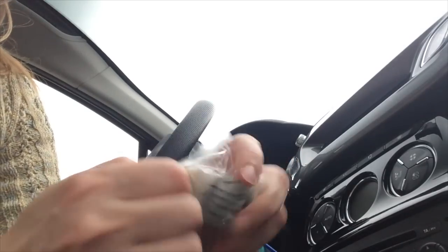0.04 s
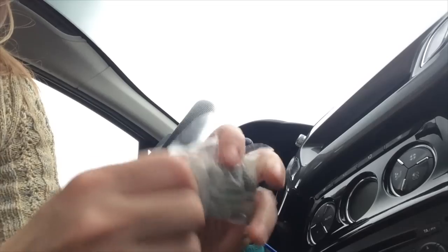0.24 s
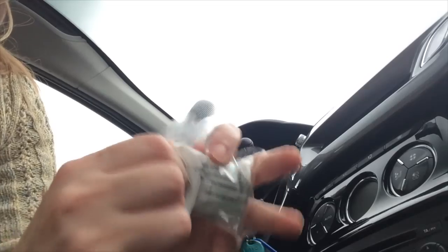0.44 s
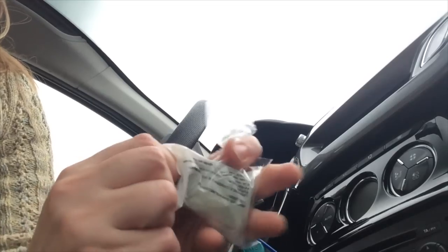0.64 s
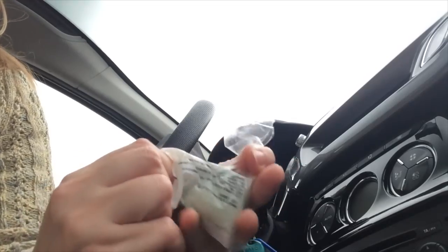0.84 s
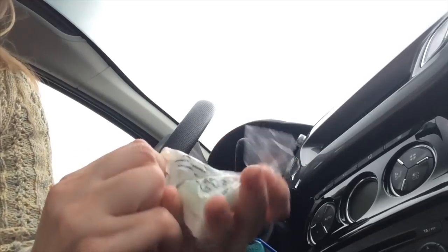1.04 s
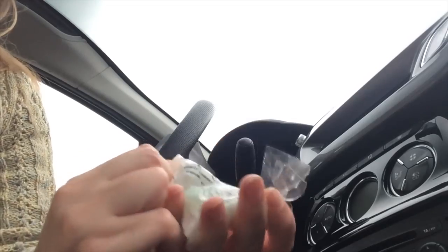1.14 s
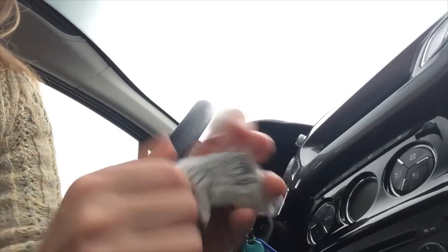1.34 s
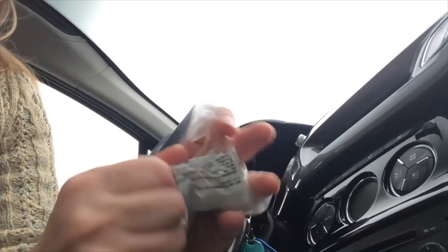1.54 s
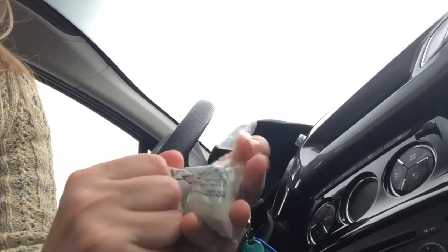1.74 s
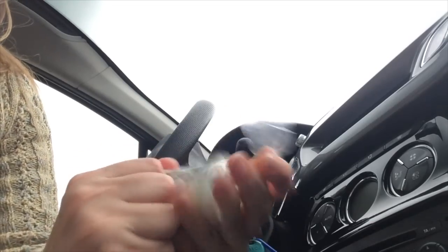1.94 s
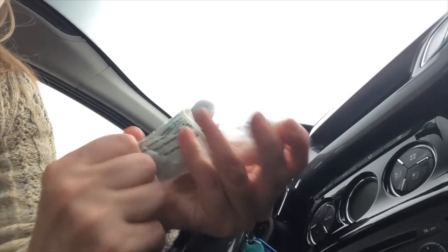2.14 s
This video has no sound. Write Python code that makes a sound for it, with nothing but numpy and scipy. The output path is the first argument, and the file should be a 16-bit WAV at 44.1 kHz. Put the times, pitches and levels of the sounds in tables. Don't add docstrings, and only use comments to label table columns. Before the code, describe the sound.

Close, dry plastic film crackling in irregular snaps, ending in a hard loud crush

```python
import sys
import numpy as np
from scipy import signal
from scipy.fft import rfft, irfft
from scipy.io import wavfile
from scipy.ndimage import uniform_filter1d

SR = 44100
rng = np.random.default_rng(int(sys.argv[2]) if len(sys.argv) > 2 else 0)


def convert_level_to_amplitude(level_db):
    exponent = np.asarray(level_db, float) / 20
    return 10 ** exponent


def digitize_waveform(pressure):
    field = np.atleast_2d(pressure).T
    bounded = np.clip(field, -1, 1)
    quanta = np.round(bounded * 32767).astype(np.int16)
    wavfile.write(sys.argv[1], SR, quanta)


N = 96049

# centre in Hz, width in Hz, level in dB.
ENGINE_MODES = [(59.6, 8.9, -61), (100.6, 14.5, -61)]
# frequency in Hz, density in dB per Hz.
AIR_SPECTRUM = [(130, -8.5), (1000, -16), (14000, -24.5)]
# frequency in Hz, t60 in seconds.
CABIN_DECAY = [(600, 0.052), (2500, 0.042), (11000, 0.036)]
# start in seconds, peak in dB, pitch in
# Hz, t60 in seconds.
AIR_POPS = [
    (1.6383, -5, 720, .004),
    (.553, -35, 165, .06),
    (1.1158, -24, 300, .006),
    (.8241, -27, 300, .008),
]
# start in seconds, peak in dB, pitch in Hz, t60 in seconds.
PANEL_RINGS = [
    (.3725, -24, 1000, .012),
    (.6528, -8, 1600, .02),
    (.0856, -11, 3300, .007),
    (1.0608, -11, 1150, .006),
]
# frequency in Hz, level in dB.
FILM_COLOUR = [(700, -4), (1500, -0.5), (4500, 4.5), (9000, -8), (14000, -3.5)]
# start in seconds, length in seconds, level in dB.
RUBS = [
    (-.02, 0.035, -53),
    (0.09, 0.1, -37),
    (0.342, 0.04, -38),
    (0.497, 0.056, -38),
    (0.564, 0.108, -33),
    (1.402, 0.052, -38),
    (1.642, 0.055, -55),
    (2.033, 0.063, -23),
    (2.154, 0.016, -42),
]
# start in seconds, peak in dB, ring in Hz, brightness in dB.
CREASES = [(0.0464, -20, 13100, 19), (0.0495, -35, 13220, 11), (0.0665, -18, 3600, 8.5),
           (0.0858, -8, 10560, 15), (0.0927, -16, 7140, 2), (0.109, -27, 1700, -8),
           (0.1129, -22.5, 6370, -20), (0.1251, -21.5, 1500, 2), (0.1324, -26, 1790, -7),
           (0.1441, -23, 4260, -30), (0.1523, -26, 2330, -5), (0.1595, -21.5, 1640, 3),
           (0.1673, -25, 4690, -13), (0.1715, -21, 3600, -43), (0.1786, -17, 6290, -3),
           (0.1818, -19.5, 2390, -2), (0.2204, -17, 1870, -10), (0.2272, -14, 990, -1),
           (0.2562, -12, 1620, 1), (0.2658, -23, 9000, -4), (0.2752, -21.5, 1760, -24),
           (0.2805, -21, 4270, 2), (0.3073, -34.5, 5140, 3), (0.3095, -20, 4470, -7),
           (0.3162, -20, 1450, -33), (0.3356, -19.5, 5400, -24), (0.3426, -12, 5640, -32.5),
           (0.346, -13, 6700, 26), (0.3535, -17.5, 3030, -12), (0.3727, -24, 1080, 0),
           (0.3972, -12, 7800, 6.5), (0.4401, -33.5, 1500, -15), (0.456, -35, 3280, -26),
           (0.4682, -34, 3720, 8), (0.4717, -22.5, 8910, -8), (0.4821, -6.5, 5540, -9.5),
           (0.5015, -21, 5660, -19), (0.511, -18, 5900, 15), (0.5171, -18, 6200, -16),
           (0.5204, -18.5, 6500, -12), (0.5225, -17.5, 5800, -17), (0.5281, -35, 7540, 5),
           (0.5359, -15, 7580, 22), (0.5425, -18, 13800, 10), (0.5518, -21, 2470, -35),
           (0.5576, -19.5, 5400, -28), (0.5668, -33, 7540, -3), (0.5725, -19, 7300, -11),
           (0.5839, -23, 11930, -21), (0.5882, -18, 13390, 2),
           (0.5977, -18, 7300, -9), (0.6187, -13.5, 2880, -2), (0.624, -33, 7750, -3),
                (0.6524, -10, 5700, -13), (0.6712, -17, 12600, 20), (0.7171, -18, 13700, 2),
                (0.7473, -35, 11540, 11), (0.766, -16.5, 3300, -20), (0.7694, -29, 2660, -13),
                (0.774, -10.5, 13800, 12), (0.7813, -14.5, 4350, -2), (0.7941, -10.5, 10900, 20),
                (0.8104, -13, 5700, -1), (0.8239, -8, 4400, -15), (0.829, -15, 4130, 22),
                (0.8498, -28.5, 4260, 0), (0.8797, -43, 1460, -18), (0.8824, -38, 4520, -14),
                (0.8901, -11, 12500, -9), (0.893, -25, 10160, 17), (0.9193, -14.5, 6700, 2),
                (0.9347, -23, 6760, 4), (0.9695, -16.5, 1580, 10), (0.9745, -19, 9300, -5),
                (0.977, -25, 4010, -3), (0.9963, -20.5, 6540, -8), (1.027, -13.5, 10700, 10),
                (1.0553, -31, 4180, 2), (1.0613, -5, 5350, -17.5), (1.0638, -9.5, 7000, 25),
                (1.11, -21.5, 1480, -6), (1.116, -7.5, 12900, -4), (1.1222, -15, 6450, -12),
                (1.1462, -29, 5640, 3), (1.1531, -29.5, 1760, -26), (1.1575, -36, 2840, -12),
                (1.1593, -33, 4390, -2), (1.1755, -11, 5900, -10), (1.1773, -49, 5860, 2),
                (1.213, -14.5, 2900, 10.5), (1.2164, -33.5, 8600, -21), (1.2726, -53, 1510, -28),
                (1.2944, -16, 1520, 9), (1.2983, -20.5, 10500, -4), (1.3044, -12.5, 3560, 12),
                (1.322, -17.5, 4030, 2), (1.3464, -18.5, 2700, -36), (1.3616, -17.5, 6300, 5),
                (1.3808, -29, 3270, 1), (1.3827, -10.5, 3940, 1),
           (1.3984, -6.5, 3330, -4), (1.408, -19.5, 1200, -15), (1.4152, -17.5, 1890, -34),
                (1.4253, -28, 1810, -28), (1.4311, -13, 3840, 5), (1.4343, -15.5, 1790, -13),
                (1.4528, -16.5, 2860, -7), (1.4786, -20.5, 1540, -45), (1.4945, -13, 2600, -28),
                (1.5183, -15, 3640, -35), (1.525, -18, 4240, -14), (1.5309, -17, 4040, -7),
                (1.5593, -29.5, 8700, -15), (1.5705, -36, 3700, 1), (1.5752, -9.5, 12900, -1),
                (1.613, -48, 5120, -4), (1.6275, -29, 6550, -6), (1.6387, -6, 6600, 5.5),
                (1.6496, -23, 5000, -2), (1.6646, -27.5, 3960, -8), (1.6816, -29, 6100, -3),
                (1.699, -38, 6500, 2), (1.7093, -23, 5570, -4), (1.7202, -15, 2710, -30),
                (1.7642, -26.5, 3040, -27), (1.7668, -35.5, 5500, -15), (1.7876, -19.5, 2130, -11),
                (1.7972, -28.5, 6150, -3), (1.8332, -29, 2120, -34), (1.8456, -37, 7200, -4),
                (1.8782, -61, 7760, 23), (1.883, -34.5, 12800, -10), (1.8945, -13, 3300, 14),
                (1.8984, -22, 3500, 20), (1.941, -30, 7020, 1), (1.9435, -8.5, 1400, 2.5),
                (1.9565, -14, 3420, -38), (1.961, -25, 4160, -11), (1.9764, -40, 1210, -18),
                (1.991, -10.5, 7550, -20), (1.9948, -10.5, 10000, -16), (2.0081, -13, 13800, -4),
                (2.0193, -27, 13870, -21), (2.0237, -3, 4220, -30.5), (2.026, -8, 3270, -6),
                (2.033, -0.5, 4130, 1), (2.0354, -10, 4260, -32), (2.0424, -8, 6640, -16),
                (2.0511, 2, 1590, 4.5), (2.0551, -2, 3960, 14),
           (2.0595, -6.5, 1940, -10), (2.065, -27, 7020, -8), (2.0689, -6, 2870, -18),
                   (2.0744, -16, 3900, -16), (2.0755, -0.5, 7540, 10), (2.0855, -9, 5100, 2),
                   (2.0872, -7, 3530, -10), (2.0932, -29, 3750, -7), (2.108, -11.5, 3780, -3),
                   (2.1303, -22.5, 2850, -10), (2.1339, -21.5, 3280, -36), (2.1579, -22, 3030, -31),
                   (2.1767, -25.5, 3120, -5)]

AIR_DB, FLOOR_FOLLOWS_DB_PER_DB = -56, 0.25
CABIN_DB, CABIN_DELAY_S, CABIN_RISE_S = -11.5, 0.0023, 0.0002
FOLDS_PER_S, FOLD_SPREAD_DB, FOLD_RING_CYCLES, CLUMP_DB = 4000, 4.0, 5.0, 3.0
RUB_RISE_S, REST_DB = 0.006, -75.0
SETTLE_DB, SETTLE_S = -39, 0.013
SPOTS = 5
BUCKLE_S, RING_CYCLES, SNAP_DB = 0.00025, 6.4, 3
FLUTTER_GAIN, FLUTTER_S = 0.22, 0.0004
SHEET_HZ, SHEET_WIDTH_HZ, SHEET_DB = 1706, 980, -12.5
EDGE_HZ, EDGE_DB, BROAD_DB = 7470, 3, 0
STIFF_HZ, PUSH_HZ, PUSH_DB = 444, 350, -39
POP_LOW_CUT_HZ, MIC_TOP_HZ = 230, 15900


def rms_one(x):
    return x / np.sqrt(np.mean(x ** 2) + 1e-20)


def at_hz(points, hz):
    points = np.array(points)
    return np.interp(np.log(hz), np.log(points[:, 0]), points[:, 1])


def drift(rate_hz):
    r = np.exp(-2 * np.pi * rate_hz / SR)
    wander = signal.lfilter([1], [1, -2 * r, r * r], rng.standard_normal(N + 8000))
    return rms_one(wander[8000:])


def resonate(x, hz, width_hz):
    r = np.exp(-np.pi * width_hz / SR)
    poles = [1, -2 * r * np.cos(2 * np.pi * hz / SR), r * r]
    return signal.lfilter([(1 - r * r) / 2, 0, (r * r - 1) / 2], poles, x)


def cut(x, hz, kind, order=2):
    return signal.sosfilt(signal.butter(order, hz, kind, fs=SR, output="sos"), x)


def engine():
    rumble = np.zeros(N)
    for hz, width_hz, db in ENGINE_MODES:
        mode = resonate(rng.standard_normal(N), hz, width_hz)
        rumble += convert_level_to_amplitude(db) * rms_one(resonate(mode, hz, 2 * width_hz))
    return rumble


def air():
    hz = np.maximum(np.arange(N // 2 + 1) * SR / N, 1)
    hush = irfft(rfft(rng.standard_normal(N)) * convert_level_to_amplitude(at_hz(AIR_SPECTRUM, hz)), N)
    return convert_level_to_amplitude(AIR_DB) * rms_one(cut(hush, 49, "high"))


def cabin(x):
    t = np.arange(SR // 6) / SR
    edges_hz = 250 * 2 ** np.arange(0, 6.4, 0.5)
    late_s = np.clip(t - CABIN_DELAY_S, 0, 1)
    white = rng.standard_normal((2, len(t)))
    tail = np.zeros(len(t))
    for k, (low_hz, high_hz) in enumerate(zip(edges_hz, edges_hz[1:])):
        band = cut(white[k % 2], [low_hz, high_hz], "band")
        t60_s = at_hz(CABIN_DECAY, np.sqrt(low_hz * high_hz))
        tail += band * convert_level_to_amplitude(-60 * late_s / t60_s)
    tail *= 1 - np.exp(-late_s / CABIN_RISE_S)
    return convert_level_to_amplitude(CABIN_DB) * signal.fftconvolve(x, tail / np.sqrt(np.sum(tail ** 2)))[:N]


def decaying_cycles(rows):
    t = np.arange(N) / SR
    out = np.zeros(N)
    for start_s, db, hz, t60_s in rows:
        age_s = t - start_s
        decay = convert_level_to_amplitude(-60 * np.clip(age_s, 0, 1) / t60_s)
        out += convert_level_to_amplitude(db) * np.sin(2 * np.pi * hz * age_s) * decay * (age_s > 0)
    return out


def air_pops():
    return cut(decaying_cycles(AIR_POPS), POP_LOW_CUT_HZ, "high")


def panels():
    return cut(decaying_cycles(PANEL_RINGS), 2 * STIFF_HZ, "high", order=4)


def unrest(snapped):
    decay = np.exp(-1 / (SETTLE_S * SR))
    return convert_level_to_amplitude(SETTLE_DB) * signal.lfilter([0.1], [1, -decay], np.abs(snapped))


def crackle(settling):
    t = np.arange(N) / SR
    effort = convert_level_to_amplitude(REST_DB) + settling
    for start_s, long_s, db in RUBS:
        inside_s = np.minimum(t - start_s, start_s + long_s - t)
        effort = effort + convert_level_to_amplitude(db) * np.clip(inside_s / RUB_RISE_S + 0.5, 0, 1)
    sizes = convert_level_to_amplitude(FOLD_SPREAD_DB * np.minimum(rng.exponential(1, N), 2.8)) * rng.choice([-1, 1], N)
    born = rng.random(N) < FOLDS_PER_S * convert_level_to_amplitude(CLUMP_DB * drift(90)) / SR
    pitches_hz = np.geomspace(700, 14500, 22)
    pitch_index = rng.integers(0, 22, N)
    folds = np.zeros(N)
    for k, hz in enumerate(pitches_hz):
        clicks = sizes * born * (pitch_index == k) + 1e-18
        ring = resonate(resonate(clicks, hz, 2 * hz / FOLD_RING_CYCLES), hz, hz)
        folds += convert_level_to_amplitude(at_hz(FILM_COLOUR, hz)) * rms_one(ring) * np.sqrt(hz)
    return effort * rms_one(folds)


def snap(db, ring_hz, bright_db):
    t = np.arange(512) / SR
    burst = FLUTTER_GAIN * rng.standard_normal(len(t)) * t / FLUTTER_S * np.exp(1 - t / FLUTTER_S)
    burst[int(BUCKLE_S * SR)] += 2
    ring = rms_one(resonate(resonate(burst, ring_hz, 2 * ring_hz / RING_CYCLES), ring_hz, ring_hz))
    sheet = rms_one(resonate(burst, SHEET_HZ, SHEET_WIDTH_HZ))
    edge = rms_one(cut(burst, EDGE_HZ, "high", order=4))
    broad = rms_one(cut(cut(burst, 2610, "high"), EDGE_HZ, "low"))
    push = rms_one(cut(t / BUCKLE_S * np.exp(1 - t / BUCKLE_S), PUSH_HZ, "low"))
    film = ring + convert_level_to_amplitude(SHEET_DB - bright_db / 2) * sheet
    film = film + convert_level_to_amplitude(EDGE_DB + bright_db / 2) * edge + convert_level_to_amplitude(BROAD_DB) * broad
    whole = cut(film, STIFF_HZ, "high") + convert_level_to_amplitude(PUSH_DB + db) * push
    peak_rms = np.sqrt(uniform_filter1d(whole ** 2, size=22).max())
    return convert_level_to_amplitude(db + SNAP_DB) * whole / peak_rms


def snaps():
    rows = CREASES
    out = np.zeros((SPOTS, N + SR))
    for k, (start_s, db, ring_hz, bright_db) in enumerate(rows):
        one = snap(db, ring_hz, bright_db)
        i = int((start_s - BUCKLE_S) * SR)
        out[k % SPOTS, i:i + len(one)] += one
    return out[:, :N]


def scene():
    spots = snaps()
    spots[0] += crackle(unrest(spots.sum(axis=0)))
    spots[1] += panels()
    packet = sum(x + cabin(x) for x in spots)
    busy_db = 10 * np.log10(uniform_filter1d(packet ** 2, size=2600) + 1e-9) + 30
    background = convert_level_to_amplitude(FLOOR_FOLLOWS_DB_PER_DB * busy_db) * (engine() + air())
    return (packet + air_pops() + background)[None]


def top_cut(x):
    return signal.sosfilt(signal.butter(12, 16390, fs=SR, output="sos"), x)


def record(dry):
    dull = signal.sosfilt(signal.cheby2(10, 55, MIC_TOP_HZ, fs=SR, output="sos"), dry)
    return top_cut(np.clip(dull, -1, 1))


dry = scene()
out = record(dry)
digitize_waveform(out)
```